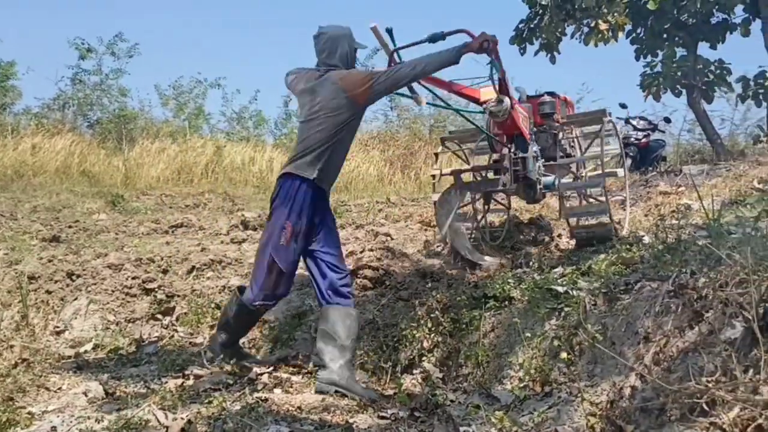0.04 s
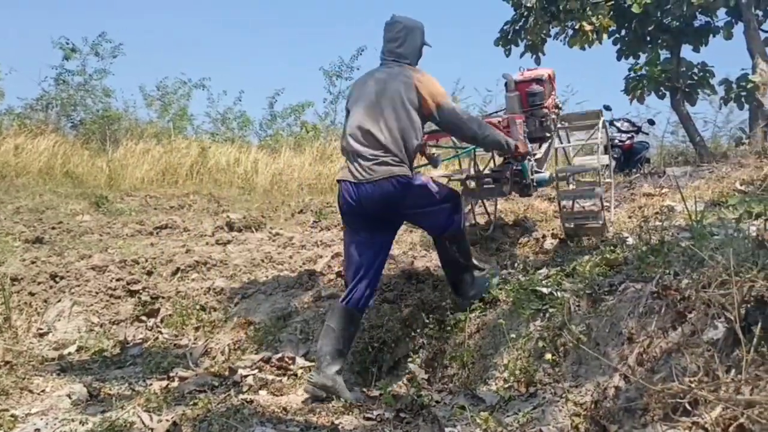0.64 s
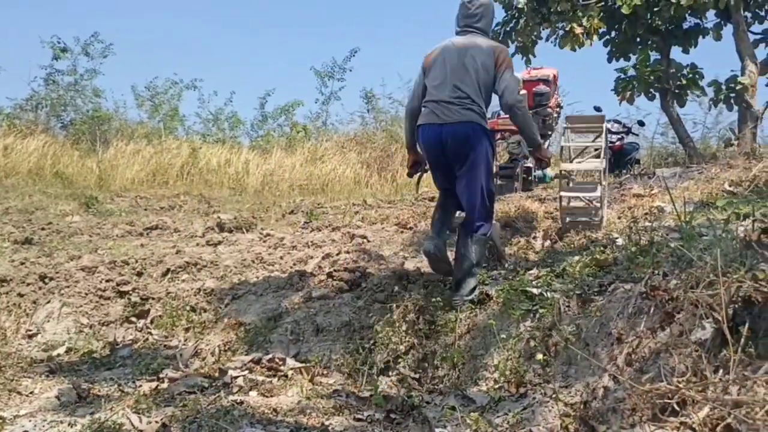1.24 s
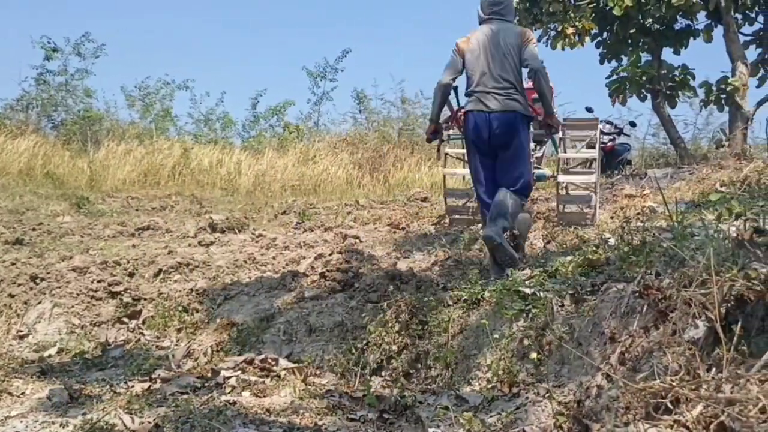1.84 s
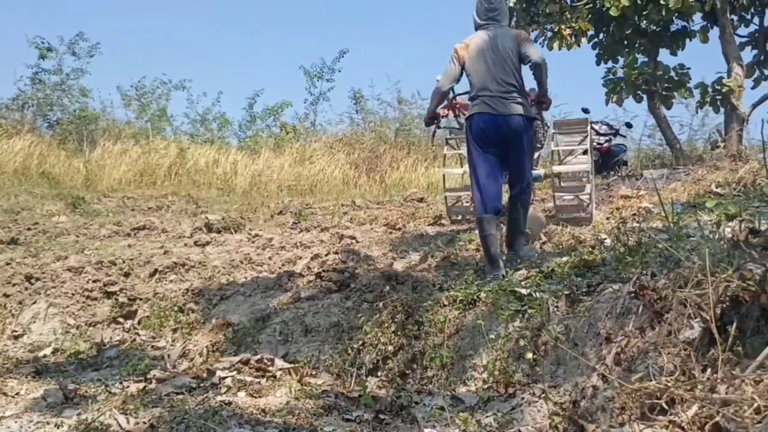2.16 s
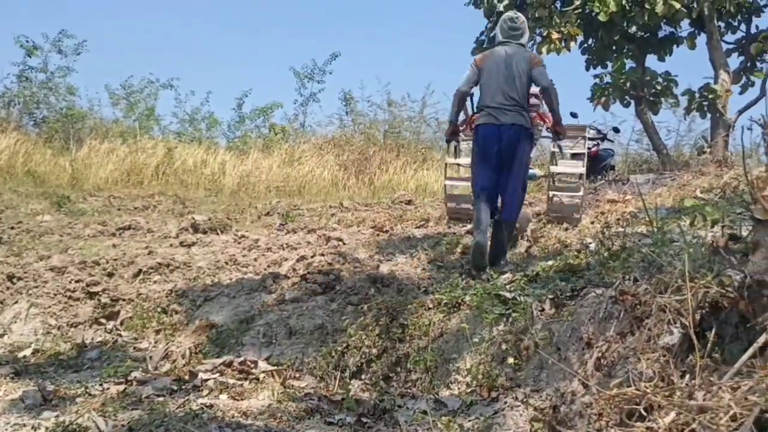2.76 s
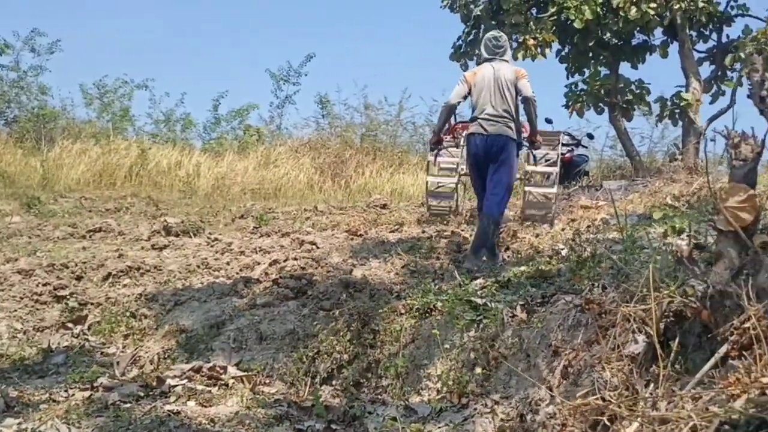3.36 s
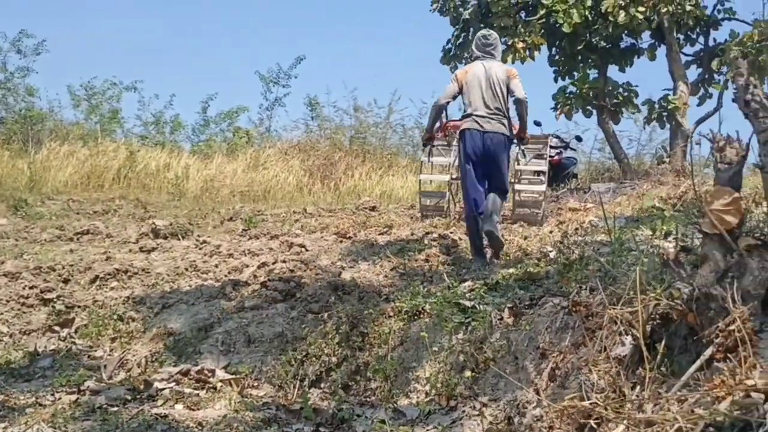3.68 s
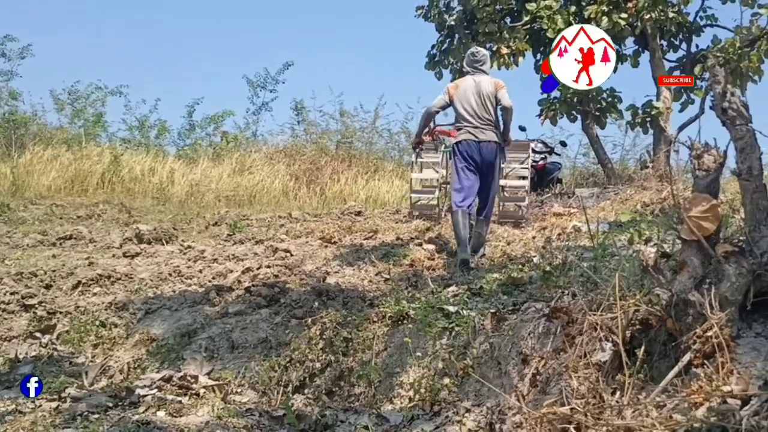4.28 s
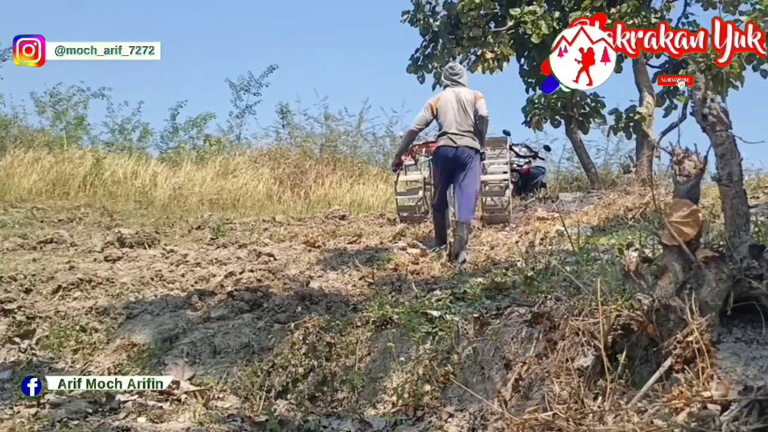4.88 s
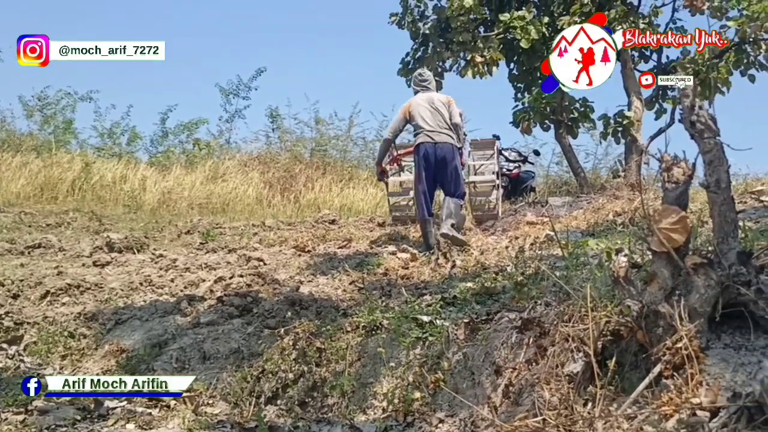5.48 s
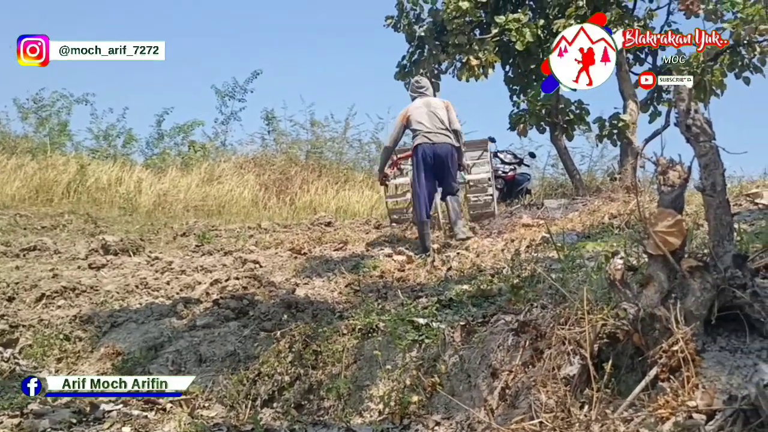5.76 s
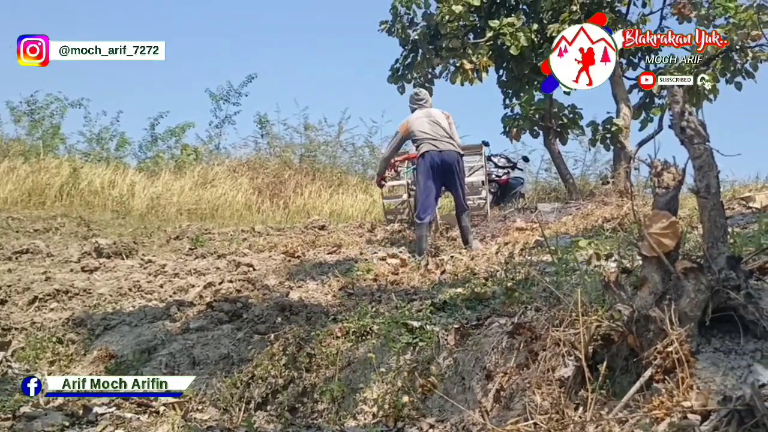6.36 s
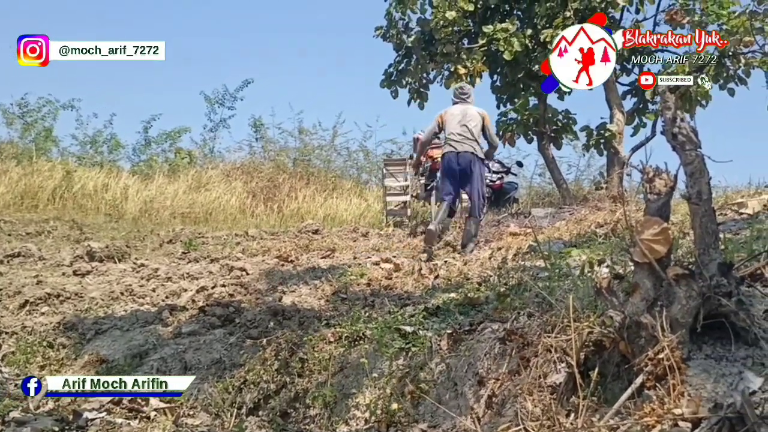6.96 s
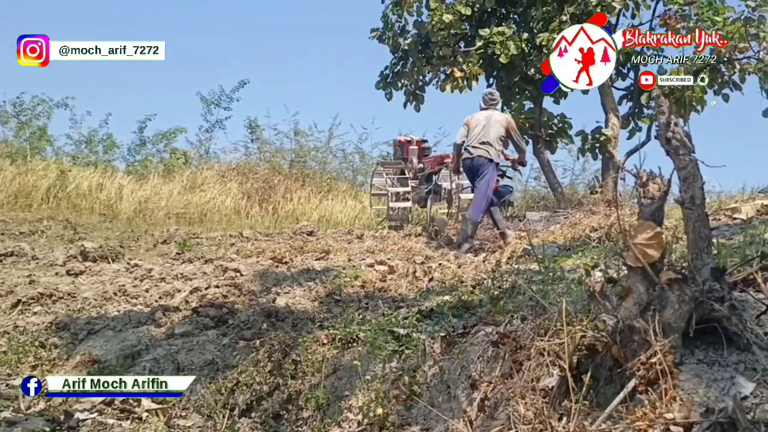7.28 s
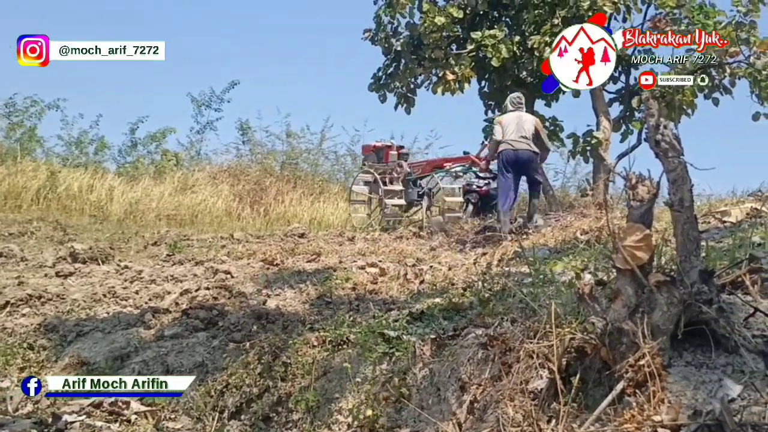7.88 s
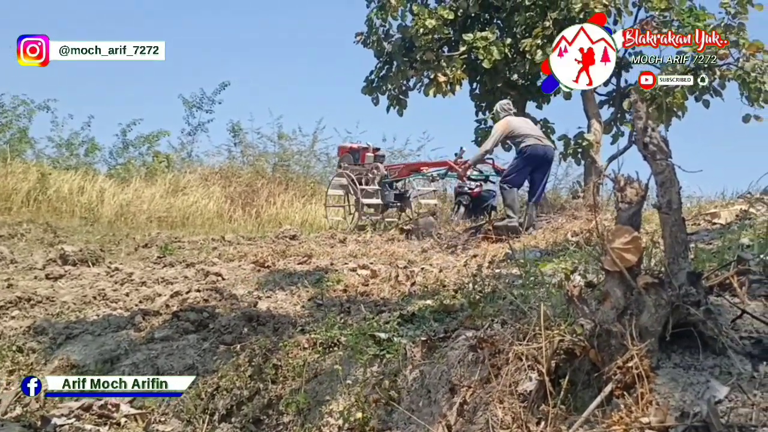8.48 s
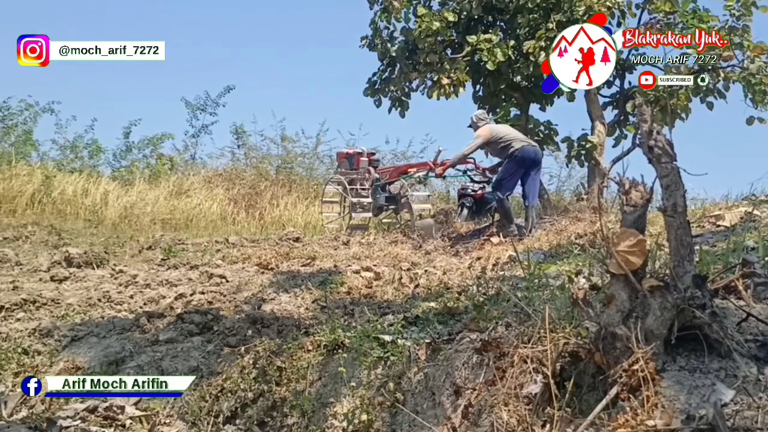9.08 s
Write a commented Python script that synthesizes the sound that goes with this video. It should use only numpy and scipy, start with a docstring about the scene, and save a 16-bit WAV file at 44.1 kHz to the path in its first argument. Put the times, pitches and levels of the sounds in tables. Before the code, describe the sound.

A walking tractor's one-cylinder diesel chugs up a dry bank outdoors, about seven thumps a second, with a hard knock and tinny buzz. Loose guards and steel wheels rattle, clank and scrape over clods, most strongly at first. The engine recedes slightly, and light wind rumbles on the microphone midway. Near the end it slows as the tractor turns, steel squeals faintly, and a loud clank follows.

```python
"""A walking tractor's one-cylinder four-stroke diesel chugs up a dry bank, about seven firings a second.
In each cycle the intake hoots, the firing knocks on the engine block, then the exhaust thumps and makes
the tin silencer buzz. From the start, loose guards and steel cage wheels rattle and scrape over the
clods, with sharp clanks mostly in the first second. Midway, light wind rumbles. After about seven
seconds the tractor turns side-on; the engine slows, dry steel squeals, and a loud clank ends it."""
import sys
import numpy as np
from scipy import signal
from scipy.fft import rfft, irfft
from scipy.io import wavfile

SR = 44100
rng = np.random.default_rng(int(sys.argv[2]) if len(sys.argv) > 2 else 0)


def bounce(signal):
    """Save signal as a 16-bit WAV file at the path given by the first command-line argument."""
    frames = np.transpose(np.atleast_2d(signal))
    limited = np.clip(frames, -1, 1)
    pcm = np.round(limited * 32767).astype(np.int16)
    wavfile.write(sys.argv[1], SR, pcm)


N = 402633
T = np.arange(N) / SR

# Levels are relative. fade_s is the time to die away by 60 dB; a small width_hz rings for long.
# Engine speed, sagging on the bank and falling as the throttle closes in the turn: time_s, firings_per_s
ENGINE_SPEED = [(0.0, 7.668), (0.35, 7.513), (0.5, 7.065), (1.15, 6.804), (1.6, 7.214), (1.75, 6.834),
                (2.05, 7.422), (2.95, 7.229), (3.55, 7.193), (3.95, 7.578), (5.0, 7.027), (5.75, 6.951),
                (6.05, 7.099), (6.4, 6.747), (7.25, 7.452), (8.25, 6.894), (8.75, 5.987), (9.1, 5.989)]
# An ordinary cycle as load and distance change: time_s, knock_db, thump_db, buzz_db, extra_treble_db
CYCLE_LEVELS = [(0, -29.5, -24.5, -29, -22), (.56, -30.5, -24, -36, 8), (1.1, -32, -23, -37, 13),
                (1.499, -30.5, -24, -33.5, 10), (2.0, -34.5, -24.5, -50, 1.5), (2.55, -35, -24.8, -48, 6),
                (3.55, -33, -25, -37.5, -0.5), (4.05, -35, -26.5, -46.5, 4), (4.8, -35, -25.5, -40.5, -7.5),
                (5.9, -35.5, -26, -34, -2), (6.751, -36, -26.5, -39, -2), (7.401, -35, -29, -38.5, 5),
                (7.901, -31.5, -26.5, -41, 3), (8.25, -32.5, -29.5, -40.5, 7.5),
                (8.802, -37, -28.5, -34.5, 8.5), (9.1, -34, -27, -25.5, -4)]
# Firings that burn harder or weaker than their neighbours: time_s, extra_strength_db, extra_buzz_db
ODD_FIRINGS = [(.15, 0.2, 3.5), (.28, -7.5, -2), (.7, 1.5, 2.5), (.84, -7, -0.5), (.99, 1.1, 1),
               (1.28, 0, 3.5), (1.85, 2, 10.5), (2.13, 0.5, 9.5), (2.53, 0, 9.5), (2.81, 1.2, 5),
               (3.08, 1, 6.5), (3.36, 0.6, 3.5), (3.77, 0.8, 7), (4.17, -1, 4), (4.31, -4.5, -14),
               (4.45, 1, 8), (4.58, -3.5, -21), (4.72, 0, 6.5), (5.0, .8, 6.5), (5.43, -0.8, 3.5),
               (6.14, -2.5, -7), (6.29, 1, 2), (6.72, -2, -4), (6.87, 0.5, 4), (8.11, 0, 5.5)]
# Where the tractor is: time_s, nearness_db (for drone and intake), side_on_share (0 to 1)
TRACTOR_PATH = [(0, 2.5, 0), (1.5, 2, 0), (4, 0, 0.18), (6.7, -1.5, .1), (7.6, -2.5, 0.8),
                (9.1, -6.5, 0.53)]
# Tone colours of the drone, the rattle, the small clinking parts and the buzz: pitch_hz, level_db
DRONE_COLOUR = [(25, -60), (40, -17), (60, -4), (100, 3), (160, -5.5), (230, -6.5), (330, -14)]
RATTLE_COLOUR = [(250.0, -12), (370.0, -11), (520.0, 6), (750.0, -3), (1200.0, -5), (1500.0, -2.5),
                 (2050.0, -12.0), (2700.0, -8.5), (3900.0, -10), (6800.0, -11.5), (8200.0, -6.5),
                 (11000.0, -28.5), (13000.0, -16.5), (15300.0, -20)]
CLINK_COLOUR = [(2000, -4), (3000, -4), (4000, 0.5), (5500, 0), (6800, -6), (8200, 1), (10500, -9.5),
                (13000, -12), (15300, -8)]
BUZZ_COLOUR = [(200, -0.5), (520, -11), (750, -6), (1200, -10), (1500, -1), (2050, -11.5), (2700, -11),
               (3900, -2.5), (6800, -14), (8200, -5), (11000, -23), (13000, -25), (15300, -18)]
# How hard loose parts shake, most as the wheels climb the edge of the bank: time_s, level_db
SHAKING = [(.1, -35.5), (.38, -34.5), (.53, -37.5), (1.25, -40), (1.9, -38), (3.1, -42), (4.2, -41),
           (5.2, -42.5), (6.5, -43.5), (7.4, -42), (8.2, -47), (8.37, -35), (8.53, -44.5), (8.85, -40.5),
           (9.1, -45.5)]
# High tin tones and low plate tones of the silencer and guards: pitch_hz, width_hz, level_db
TIN_TONES = [(2154, 27, 4), (3400, 100, 7.5), (3946, 42, 9.5), (5010, 46, 6), (5440, 13, 2.5),
             (7690, 41, -7), (10100, 92, -37), (15210, 110, 3.5)]
PLATE_TONES = [(582, 28, -6), (913, 36, -2.5), (971, 26, 5.5), (1004, 9.7, -27.5), (1438, 70, -6),
               (1858, 9.7, -6)]
# Ringing of the engine block: pitch_hz, width_hz, level_db, extra_side_on_db
BLOCK_TONES = [(457, 38, 2, -14.5), (552, 24, -6.5, -3), (840, 60, -13, 3), (1039, 15, -2, 0),
               (1380, 100, -2, 7), (1537, 137, -1, 1.5), (1770, 79, -8.5, 17), (1867, 54, -8.5, -8),
               (2397, 90, -7.5, -56), (2824, 190, -18.5, 23), (3077, 57, -8.5, 5)]
# Gas pushes as the exhaust valve opens (first rush, piston sweep, valve closing, pipe rebound):
# delay_s, pitch_hz, level_db, rise_s, fade_s
EXHAUST_PUFFS = [(-.001, 110, 6.5, 0.0024, 0.062), (0.0097, 113, 12.5, 0.002, 0.075),
                 (0.037, 240, -6.5, .004, .032), (.04, 160, 3, .0027, 0.045)]
# Sharp metal clanks, and hard exhaust blasts rattling the tin silencer: start_s, level_db, extra_treble_db
METAL_CLANKS = [(0.1657, -18.5, -28), (0.2956, -16.5, -24), (0.359, -15.5, -37), (0.449, -20, 6.5),
                (0.732, -20.5, -14), (0.7945, -24.5, 2), (0.848, -20, -2), (1.028, -22, -3),
                (1.059, -20.5, -16), (1.316, -25, 0), (2.399, -32.5, 13), (5.035, -24, -9),
                (5.4397, -28, 4), (6.901, -34, -4), (7.175, -28.5, 5), (8.143, -26, -6), (8.437, -44, -23),
                (8.756, -43, -15), (9.0774, -9.5, -22)]
# Single steel parts that ring on: start_s, pitch_hz, level_db, fade_s
STEEL_PINGS = [(.2, 986, -24.5, 0.36), (0.297, 4040, -15, 0.056), (.31, 947, -22, 0.23),
               (0.399, 1037, -32, 0.17), (.452, 6100, -39, 0.39), (0.74, 1023, -16, 0.12),
               (1.026, 8020, -25, 0.18), (1.882, 1048, -25, 0.081), (5.80, 9950, -51, 0.61),
               (7.28, 11900, -55, 0.53), (7.459, 11570, -54, 0.46), (7.584, 8150, -26.5, 0.081),
               (8.144, 3710, -20, 0.033), (8.44, 3460, -13.5, 0.029)]
# Steel dragging through dry soil: middle_s, length_s, level_db
SOIL_SCRAPES = [(0.243, 0.077, -30.5), (0.336, 0.082, -40), (0.411, 0.043, -31), (2.4, 0.05, -40),
                (4.236, 0.15, -35), (8.648, 0.25, -41)]
# Puffs of wind: middle_s, length_s, level_db
WIND_GUSTS = [(4.604, 1, -40.5), (5.21, 0.68, -47), (6.801, 0.37, -40)]
# Steel rubbing in the turn: middle_s, length_s, pitch_hz, level_db
TURN_SQUEALS = [(8.36, 0.056, 841, -35), (8.464, 0.082, 898, -41), (8.62, 0.11, 910, -40.5),
                (8.762, 0.045, 892, -39), (8.954, 0.082, 915, -40)]

FIRST_FIRING_S = .02
EXHAUST_OPENS, INTAKE_SHUTS = .22, .785  # shares of a cycle after the firing


def amp(db):
    """Turn decibels into a factor to multiply by."""
    return 10 ** (np.asarray(db) / 20)


def evened(x):
    """Scale x to an average power of 1."""
    return x / np.sqrt(np.mean(x ** 2) + 1e-20)


def add(mix, start_s, sound):
    """Mix a sound in at start_s, dropping what does not fit."""
    start = round(start_s * SR)
    part = mix[max(start, 0):][:len(sound) + min(start, 0)]
    part += sound[max(-start, 0):][:len(part)]


def noise(colour):
    """Steady noise with the given tone colour, fading beyond its lowest and highest pitch."""
    pitch_hz, level_db = np.transpose(colour)
    hz = np.fft.rfftfreq(N, 1 / SR) + 1
    ends = 1 / np.sqrt((1 + (.7 * pitch_hz[0] / hz) ** 6) * (1 + (.7 * hz / pitch_hz[-1]) ** 6))
    shape = amp(np.interp(np.log(hz), np.log(pitch_hz), level_db))
    return evened(irfft(rfft(rng.standard_normal(N)) * ends * shape, N))


def ring(drive, tones):
    """A shaken object rings at its own tones, which share the power of the drive."""
    out = 0
    for hz, width_hz, db in tones:
        decay = np.exp(-np.pi * width_hz / SR)
        feedback = decay * np.exp(2j * np.pi * hz / SR)
        out += amp(db) * signal.lfilter([np.sqrt(2 * (1 - decay ** 2))], [1, -feedback], drive).real
    return out / np.linalg.norm(amp([db for _, _, db in tones]))


def treble(x, hz):
    """The part of x above hz."""
    return signal.sosfiltfilt(signal.butter(2, hz, "high", fs=SR, output="sos"), x)


def bursts(times, levels_db, rise_s, fall_s, tail_db, tail_s):
    """Loudness curve of blows: each has a quick rise, a quick fall and a tail."""
    t, power = T[:SR // 3], np.zeros(N)
    dying = np.exp(-2 * t / fall_s) + amp(tail_db) ** 2 * np.exp(-2 * t / tail_s)
    shape = (1 - np.exp(-t / rise_s)) ** 2 * dying
    for start_s, db in zip(times, levels_db):
        add(power, start_s, amp(db) ** 2 * shape)
    return np.sqrt(power)


def chatter(per_s, spread_db, fall_s, steady):
    """Loudness curve of many small random contacts on top of a steady part."""
    size = amp(spread_db * np.minimum(rng.exponential(1, N), 4)) * (rng.random(N) < per_s / SR)
    power = signal.lfilter([1], [1, -np.exp(-2 / (fall_s * SR))], size ** 2)
    return evened(np.sqrt(power / power.mean() + steady))


def swell(middle_s, length_s, db):
    """Loudness curve of one smooth rise and fall."""
    return amp(db) * np.exp(-(2 * (T - middle_s) / length_s) ** 2)


def fading_tone(hz, db, rise_s, fade_s):
    """Trapped air or a steel part rings after one push."""
    t = T[:SR // 4]
    return -amp(db - 60 * t / fade_s) * (1 - np.exp(-t / rise_s)) * np.sin(2 * np.pi * hz * t)


def firing_times():
    """One firing for every two turns of the crank."""
    cycles = np.cumsum(np.interp(T, *np.transpose(ENGINE_SPEED))) / SR
    cycles -= np.interp(FIRST_FIRING_S, T, cycles)
    return np.interp(np.arange(int(cycles[-1]) + 1), cycles, T)


def firing_levels(firings, rebound_share=.33, buzz_spread_db=1.7):
    """Knock, thump, buzz, extra treble and clang of each cycle in dB, set by load and strength of burn."""
    time_s, *levels = np.transpose(CYCLE_LEVELS)
    knock_db, thump_db, buzz_db, treble_db = (np.interp(firings, time_s, level) for level in levels)
    extra = np.zeros((len(firings), 2))
    for when, *surge in ODD_FIRINGS:
        extra[np.argmin(abs(firings - when))] = surge
    # the speed governor answers a hard firing by weakening the next
    extra[1:] -= rebound_share * np.maximum(extra[:-1], 0)
    burn, buzz = extra.T
    buzz = buzz + buzz_spread_db * rng.standard_normal(len(firings))
    clang_db = thump_db - 9.5 + 3.3 * np.maximum(burn, 0)
    return knock_db + .55 * burn, thump_db + burn, buzz_db + buzz, treble_db + .95 * buzz, clang_db


def intake(shuts):
    """The inlet valve shuts and the air in the filter pipe hoots."""
    out = np.zeros(N)
    for start_s, (detune, louder) in zip(shuts, rng.standard_normal((len(shuts), 2))):
        hoot = fading_tone(hz=159 * (1 + .015 * detune), db=-24.4 + 1.1 * louder, rise_s=.0018, fade_s=.16)
        add(out, start_s, -hoot)
    return out


def drone():
    """The running machine gives a low, steady rumble."""
    return amp(-43.5) * noise(DRONE_COLOUR)


def clinks(shake, per_s, fade_s):
    """Small steel parts tap harder as the shaking grows; each tap rings briefly at its own pitch."""
    t, out = T[:SR // 16], np.zeros(N)
    pitch_hz, level_db = np.transpose(CLINK_COLOUR)
    for when, pitch, damping, force in rng.random((int(per_s * N / SR), 4)):
        hz = pitch_hz[0] * (pitch_hz[-1] / pitch_hz[0]) ** pitch
        tone = 1000 ** (-t / (fade_s * 2 ** -damping)) * np.sin(2 * np.pi * hz * t)
        size = shake[int(when * N)] * amp(np.interp(hz, pitch_hz, level_db) + 10 * (force ** 2 - .5))
        add(out, when * N / SR, size * tone * np.sqrt(SR / per_s / (tone @ tone)))
    return out


def loose_parts(side_on):
    """Guards, linkage and cage wheels rattle as the machine shakes; the plates sound mostly rearwards."""
    shake = amp(np.interp(T, *np.transpose(SHAKING)))
    jolts = shake * chatter(per_s=130, spread_db=2.5, fall_s=.045, steady=.15)
    drive = jolts * rng.standard_normal(N)
    jingle = amp(-6) * clinks(shake, per_s=600, fade_s=.06)
    # hard shaking sets the plates clanging out of proportion
    plates = amp(-7 - 8.9 * side_on) * ring(drive * (shake / shake.mean()) ** .35, PLATE_TONES)
    return amp(-1) * jolts * noise(RATTLE_COLOUR) + jingle + amp(-10.5) * ring(drive, TIN_TONES) + plates


def knock(firings, knock_db, side_on):
    """Burning fuel hammers the block and the piston clatters; side-on, other panels face the listener."""
    t, out = T[:SR // 8], np.zeros(N)
    hz, width_hz, db, side_db = np.transpose(BLOCK_TONES)[:, :, None]
    signs = (-1) ** np.arange(len(hz))[:, None]
    panels = signs * np.sqrt(width_hz) * np.exp(-np.pi * .7 * width_hz * t) * np.sin(2 * np.pi * hz * t)
    clatter = (1 - np.exp(-t / .0014)) * (np.exp(-t / .011) + amp(-3) * np.exp(-t / .056))
    for start_s, level_db, side in zip(firings, knock_db, side_on):
        drive = clatter * rng.standard_normal(len(t)) / np.linalg.norm(clatter)
        drive[0] += 1.1  # the same hard blow at each firing
        block = signal.fftconvolve(drive, (amp(db + side_db * side) * panels).sum(0))[:len(t)]
        add(out, start_s, amp(level_db - 6) * evened(block * (1 - np.exp(-t * 600))))
    crack = bursts(firings, knock_db, rise_s=.0012, fall_s=.009, tail_db=-7, tail_s=.045)
    hiss = noise([(250, -1.5), (700, -6), (1500, -10), (2500, -9.5), (4500, -14.5), (9000, -24),
                  (15000, -33)])
    return out + crack * hiss


def exhaust(opens, thump_db):
    """Four pushes of gas in each stroke boom in the silencer."""
    out = np.zeros(N)
    chances = rng.standard_normal((len(opens), len(EXHAUST_PUFFS), 2))
    for start_s, db, chance in zip(opens, thump_db, chances):
        for (delay_s, hz, puff_db, rise_s, fade_s), (detune, louder) in zip(EXHAUST_PUFFS, chance):
            puff = fading_tone(hz * (1 + .02 * detune), db + puff_db + .4 * louder, rise_s, fade_s)
            add(out, start_s + delay_s, puff)
    return out


def silencer(opens, buzz_db, treble_db, clang_db):
    """Each blast sets the tin shell buzzing against its mount and jingles the parts around it."""
    grain = chatter(per_s=550, spread_db=6, fall_s=.0021, steady=.98)
    blast = grain * bursts(opens - .0005, buzz_db, rise_s=.0017, fall_s=.0019, tail_db=-7, tail_s=.041)
    top_db = buzz_db + treble_db
    top = grain * bursts(opens - .001, top_db, rise_s=.002, fall_s=.0098, tail_db=-23, tail_s=.12)
    hiss = noise(BUZZ_COLOUR)
    high = treble(hiss, 9000)
    buzz = amp(9.5) * blast * (hiss - high) + amp(9) * top * high
    shell = amp(2.5) * ring(blast * rng.standard_normal(N), TIN_TONES)
    jingle = amp(4.5) * clinks(np.hypot(blast, top), per_s=650, fade_s=.08)
    push = bursts(opens, clang_db, rise_s=.0025, fall_s=.0029, tail_db=-7.5, tail_s=.033)
    clang = amp(6) * ring(push * rng.standard_normal(N), PLATE_TONES)
    return buzz + shell + jingle + clang


def frame_hum(opens, thump_db):
    """The frame keeps humming after each exhaust stroke."""
    loudness = bursts(opens + .025, thump_db, rise_s=.0037, fall_s=.055, tail_db=-27, tail_s=.06)
    return amp(-15.5) * loudness * ring(rng.standard_normal(N), [(150, 35, 0), (295, 40, -6)])


def clanks():
    """Sharp metal clanks, and hard exhaust blasts rattling the tin silencer; single parts ring on."""
    times, db, treble_db = np.transpose(METAL_CLANKS)
    blow = bursts(times, db, rise_s=.0031, fall_s=.0077, tail_db=-6, tail_s=.024)
    top = bursts(times, db + treble_db, rise_s=.00089, fall_s=.0014, tail_db=-24, tail_s=.017)
    drive = blow * rng.standard_normal(N)
    out = amp(-4.5) * blow * noise(BUZZ_COLOUR)
    out += amp(-10.5) * ring(drive, TIN_TONES) + amp(-7.5) * ring(drive, PLATE_TONES)
    out += amp(5.5) * top * treble(rng.standard_normal(N), 4800)
    for start_s, hz, ping_db, fade_s in STEEL_PINGS:
        add(out, start_s, fading_tone(hz, ping_db, .0024, fade_s))
    return out


def scrapes():
    """The plough and wheel rims drag through dry clods: a gritty swish that swells and fades."""
    loudness = sum(swell(*scrape) for scrape in SOIL_SCRAPES)
    grit = chatter(per_s=730, spread_db=2.5, fall_s=.0017, steady=.7)
    hiss = noise([(2000, -11), (4000, 3.5), (6000, -.5), (8500, -.5), (11000, -11), (15000, -8)])
    return loudness * grit * hiss


def wind():
    """Light gusts rumble on the microphone."""
    return sum(swell(*gust) for gust in WIND_GUSTS) * noise([(25, -15), (55, 4), (90, 3), (140, -12)])


def squeals(roughness_hz=56, glide_hz_per_s=330):
    """Dry steel rubs as the tractor pivots: short, rough tones that swell, rise a little and fade."""
    smoothing = signal.butter(2, roughness_hz, fs=SR, output="sos")
    rough = evened(signal.sosfilt(smoothing, rng.standard_normal((2, N))))
    out = np.zeros(N)
    for middle_s, length_s, hz, db in TURN_SQUEALS:
        t = T - middle_s
        phase = 2 * np.pi * (hz + .5 * glide_hz_per_s * t) * t
        out += swell(middle_s, length_s, db) * (rough[0] * np.sin(phase) + rough[1] * np.cos(phase))
    return out


def scene():
    """The engine's cycle times its own sounds; rattles, clanks, scrapes, squeals and wind join in."""
    firings = firing_times()
    knock_db, thump_db, buzz_db, treble_db, clang_db = firing_levels(firings)
    cycle_s = np.gradient(firings)
    shuts = firings - (1 - INTAKE_SHUTS) * cycle_s
    opens = firings + EXHAUST_OPENS * cycle_s
    time_s, nearness_db, side_on = np.transpose(TRACTOR_PATH)
    near = amp(np.interp(T, time_s, nearness_db))
    engine = near * drone() + exhaust(opens, thump_db) + near * intake(shuts) + frame_hum(opens, thump_db)
    engine += knock(firings, knock_db, np.interp(firings, time_s, side_on))
    engine += silencer(opens, buzz_db, treble_db, clang_db)
    metal = loose_parts(np.interp(T, time_s, side_on)) + clanks() + scrapes() + squeals()
    return (engine + metal + wind())[None]


def record(dry):
    """A small microphone loses the deep bass, and the very highest treble is cut off."""
    low_cut_hz, high_cut_hz = 51, 15650
    hz = np.fft.rfftfreq(N, 1 / SR) + 1
    thin = irfft(rfft(dry) / np.sqrt(1 + (low_cut_hz / hz) ** 7), N)
    high_cut = signal.firwin(511, high_cut_hz, window=("kaiser", 9), fs=SR)
    return signal.oaconvolve(thin, high_cut[None], "same")


dry = scene()
out = record(dry)
bounce(out)
```